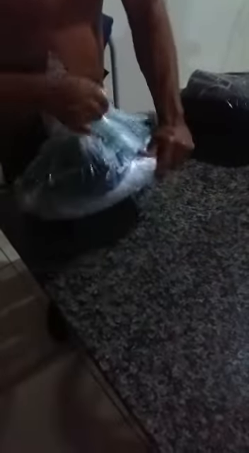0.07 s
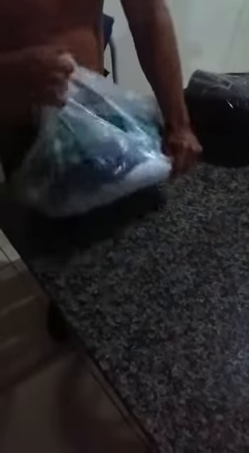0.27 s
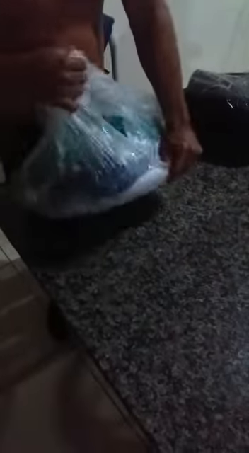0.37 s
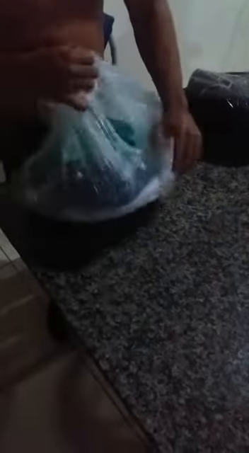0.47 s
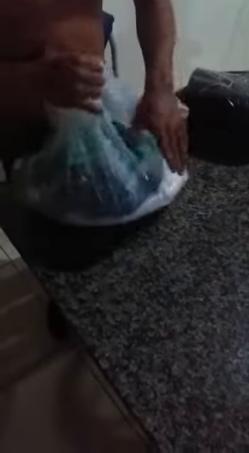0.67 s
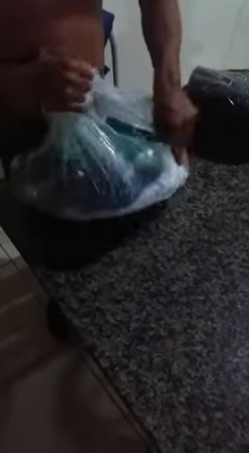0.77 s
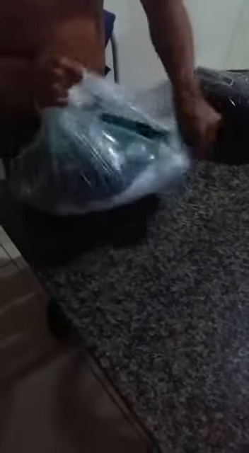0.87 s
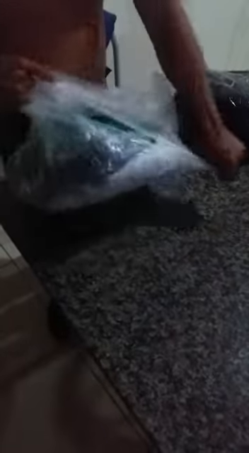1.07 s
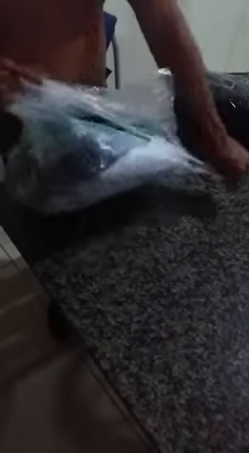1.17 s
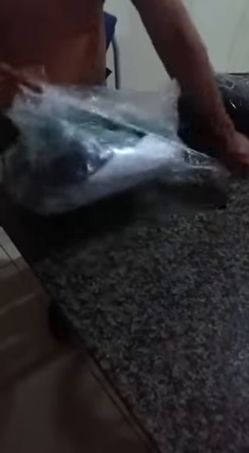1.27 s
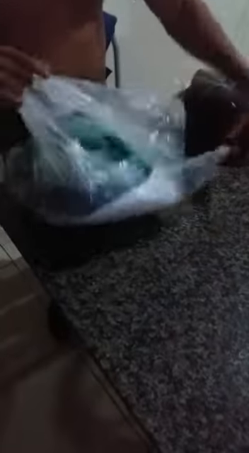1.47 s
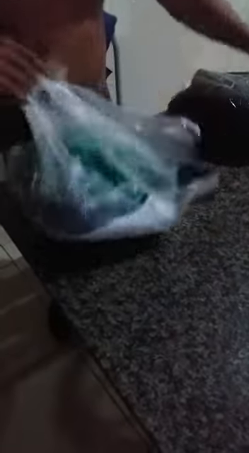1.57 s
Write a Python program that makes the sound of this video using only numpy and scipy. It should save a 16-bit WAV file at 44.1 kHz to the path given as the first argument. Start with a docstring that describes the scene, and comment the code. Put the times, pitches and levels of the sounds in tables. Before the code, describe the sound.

Two dull, clacking knocks sound as a bagged package hits a stone counter, its contents rattling briefly each time. Lighter bumps, a faint slide and soft plastic crinkling surround them, close by in a quiet, slightly echoing room.

```python
"""A packaged item in a plastic bag knocks down hard twice on a stone counter, with lighter bumps around.
Each blow is a dull thud and a plastic clack from damped resonances, plus a crunch of crushed film.
The contents clatter briefly after both hard blows, and the package slides with a faint hollow ring.
The bag rustles softly throughout in tiny crinkles, with a few sharper snaps as creases flip over.
A small, hard-walled room reverberates around it, over a quiet background."""
import sys
import numpy as np
from scipy import signal
from scipy.fft import rfft, irfft
from scipy.io import wavfile

SR = 44100
rng = np.random.default_rng(int(sys.argv[2]) if len(sys.argv) > 2 else 0)


def wrap_up_sound(samples):
    """Save the sound to the file named by the first command line argument, as 16-bit audio."""
    columns = np.atleast_2d(samples).T
    # keep every value between -1 and 1, then stretch to whole-number steps
    tamed = np.clip(columns, -1, 1)
    steps = np.round(tamed * 32767).astype(np.int16)
    wavfile.write(sys.argv[1], SR, steps)


N = 70560
T = np.arange(N) / SR


def from_db(db):
    """Decibels to gain."""
    return 10 ** (np.asarray(db) / 20)


def unit_rms(x):
    """Scale to unit rms."""
    return x / np.sqrt(np.mean(x ** 2) + 1e-20)


def at_hz(points, hz, column=1):
    """Read a table column on a log-frequency axis."""
    points = np.array(points)
    return np.interp(np.log(hz + 1e-9), np.log(points[:, 0]), points[:, column])


def equalise(x, curve):
    """Causal (minimum-phase) EQ along the given curve."""
    size = 2 * N
    gain = from_db(at_hz(curve, np.arange(N + 1) * SR / size))
    cepstrum = irfft(np.log(gain))
    cepstrum[1:N] *= 2
    cepstrum[N + 1:] = 0
    return irfft(rfft(x, size) * np.exp(rfft(cepstrum)))[:N]


def resonance(x, hz, width_hz):
    """Two-pole resonance with unity gain at its peak."""
    r = np.exp(-np.pi * width_hz / SR)
    poles = [1, -2 * r * np.cos(2 * np.pi * hz / SR), r * r]
    return signal.lfilter(np.array([1, 0, -1]) * (1 - r * r) / 2, poles, x + 1e-18)


def soften(x, hz):
    """One-pole low-pass."""
    r = np.exp(-2 * np.pi * hz / SR)
    return signal.lfilter([1 - r], [1, -r], x + 1e-18)


def butter(x, hz, kind, order):
    """Butterworth low-pass or high-pass."""
    return signal.sosfilt(signal.butter(order, hz, kind, fs=SR, output="sos"), x + 1e-18)


def cue(x, start_s):
    """Start a sound at the given time."""
    return np.concatenate([np.zeros(int(start_s * SR)), x])[:N]


def burst(t60):
    """A short, dying crackle of unit energy, whitened so that it has no pitch of its own."""
    fade = from_db(np.maximum(-60 * T / t60, -300))
    phase = np.angle(rfft(rng.standard_normal(N) * fade))
    crackle = irfft(np.exp(1j * phase), N) * np.sqrt(fade)
    return crackle / np.linalg.norm(crackle)


def grains(per_s, spread_db):
    """Random clicks of uneven size and sign."""
    sizes = from_db(spread_db * np.minimum(rng.exponential(1, N), 5))
    return sizes * rng.choice([-1, 1], N) * (rng.random(N) < per_s / SR)


# EQ of the background noise: f/Hz, gain/dB
ROOM_TONE_EQ = [(25, -85), (40, 0), (55, 0), (90, -3.5), (170, -0.5), (300, -2.5), (500, -8), (1000, -15.5),
                (2000, -16), (5000, -23), (9000, -40), (16000, -63)]


def room_tone():
    """A quiet, steady bed of dark noise."""
    return from_db(-52.5) * unit_rms(equalise(rng.standard_normal(N), ROOM_TONE_EQ))


# reverb of the hard walls: f/Hz, level/dB, t60/s
REVERB_BANDS = [(59.5, 4.5, 0.55), (162, -1, 0.62), (317, -10, 0.8), (583, -0.5, 0.57), (950, -1, 0.73),
                (1320, 0, 0.62), (2040, -7, 0.52), (4900, -2.5, .45), (8900, -4.5, 0.88), (14900, 2, 0.32)]


def reverb(send):
    """Reflections thicken after a short gap and die away, each half octave at its own rate."""
    predelay_s, build_s, lowest_hz, bands = 0.0024, 0.00067, 45, 18
    echoes = rfft(unit_rms(grains(per_s=7000, spread_db=-1)))
    hz = np.arange(N // 2 + 1) * SR / N
    band_position = np.clip(2 * np.log2((hz + 1e-9) / lowest_hz), 0, bands - 1)
    attack = 1 - np.exp(-np.maximum(T - predelay_s, 0) / build_s)
    response = 0
    for k in range(bands):
        centre_hz = lowest_hz * 2 ** (k / 2)
        fade = attack * from_db(-60 * T / at_hz(REVERB_BANDS, centre_hz, column=2))
        band = irfft(echoes * np.maximum(1 - abs(band_position - k), 0), N)
        response += band * from_db(at_hz(REVERB_BANDS, centre_hz)) * fade / np.linalg.norm(fade)
    return signal.fftconvolve(send, response)[:N]


# envelope of the crackle where the film is pulled tight: t/s, level/dB
CRACKLE_ENVELOPE = [(0, -72.5), (.1, -72), (.18, -60), (.36, -61), (.43, -64.5), (.56, -60), (.6, -68),
                    (.76, -73.5), (.81, -70), (.87, -75), (1.05, -67), (1.2, -61.5), (1.4, -77),
                    (1.52, -63), (1.6, -67)]


def fine_crackle():
    """The smallest creases tick in the top octave."""
    ticks = butter(grains(per_s=2500, spread_db=1), 7400, "high", order=2)
    return from_db(np.interp(T, *np.transpose(CRACKLE_ENVELOPE))) * unit_rms(ticks)


# envelope of the package sliding on the counter: t/s, level/dB
SLIDE_ENVELOPE = [(0, -63), (.04, -44), (.10, -54), (.15, -44), (.2, -55.5), (.32, -45), (.43, -51.5),
                  (.54, -53), (.6, -60), (1.6, -62)]


def slide():
    """Tiny slips on the stone excite a hollow ring of the package."""
    ring_hz = 692
    slips = grains(per_s=2000, spread_db=3)
    hollow = resonance(resonance(slips, ring_hz, width_hz=250), ring_hz, width_hz=500)
    return from_db(np.interp(T, *np.transpose(SLIDE_ENVELOPE))) * unit_rms(hollow)


# tone of the bag's film: f/Hz, gain/dB
FILM_EQ = [(60, -43), (160, -3.5), (450, 3), (740, -3.5), (1000, -4.5), (1450, -4), (2150, 4), (2700, -2),
           (3300, -2.5), (4200, -9.5), (5400, -7.5), (6800, -17), (8500, -24.5), (12000, -35.5),
           (15500, -34)]
# envelope of the rustle: t/s, level/dB
RUSTLE_ENVELOPE = [(0, -45.5), (.03, -47.5), (.10, -47), (.14, -41.5), (.19, -40.5), (.30, -47.5),
                   (.44, -47), (.52, -43.5), (.56, -45), (.59, -55.5), (.65, -49), (.75, -61.5),
                   (.85, -49.5), (.91, -53), (1.02, -46), (1.2, -41), (1.4, -47), (1.53, -49), (1.6, -44.5)]


def rustle():
    """Dense tiny crinkles in uneven spurts as the hands shift the bag."""
    flutter_hz, flutter_db = 30.5, 0.58
    flutter = unit_rms(soften(soften(rng.standard_normal(N), flutter_hz), flutter_hz))
    level_db = np.interp(T, *np.transpose(RUSTLE_ENVELOPE)) + flutter_db * flutter
    crinkles = grains(per_s=3500, spread_db=2.5)
    return from_db(level_db) * unit_rms(equalise(crinkles, FILM_EQ))


# single snaps of the film: t/s, pre-EQ level/dB, ring f/Hz
SNAP_CUES = [(0.0252, -12.5, 1850), (0.194, -11, 5200), (0.2081, 6.5, 5300), (0.2761, 0.5, 3100),
             (0.5148, -11, 2420), (0.5574, -6, 6500), (.628, -11.5, 4940), (.8085, -15, 5430),
             (.8555, -15, 2100), (0.9563, -14.5, 3230), (0.9932, -7.5, 3880), (1.1138, -4, 2240),
             (1.123, -5.5, 2230), (1.1291, 0, 5300), (1.1731, -6, 2260)]


def snaps():
    """A crease flips over: a very short crackle with a ring of its own."""
    track = 0
    for start_s, db, ring_hz in SNAP_CUES:
        crackle = burst(t60=0.014)
        snap = crackle + from_db(2.5) * resonance(crackle, ring_hz, width_hz=1300)
        track += from_db(db) * cue(snap / np.linalg.norm(snap), start_s)
    return equalise(track, FILM_EQ)


# the contents settling after a hard blow: t/s, hold/s, level/dB, ring f/Hz
CLATTER_CUES = [(0.227, 0.021, -31.5, 1440), (1.237, 0.052, -33.5, 1020)]


def clatter():
    """The contents chatter against each other and shake the bag."""
    release_s = 0.029
    track = 0
    for start_s, hold_s, db, ring_hz in CLATTER_CUES:
        touches = grains(per_s=690, spread_db=-1)
        contents = unit_rms(soften(resonance(touches, ring_hz, width_hz=400), hz=2600))
        film = from_db(-3) * unit_rms(equalise(touches, FILM_EQ))
        envelope = (T > start_s) * np.exp(-np.maximum(T - start_s - hold_s, 0) / release_s)
        track += from_db(db) * (contents + film) * envelope
    return track


# damped low and high modes of the package on the counter: f/Hz, width/Hz, level/dB
THUD_RESONANCES = [(181, 24, 9), (261, 193, 24), (448, 180, 28.5), (623, 64, 23)]
CLACK_RESONANCES = [(1340, 460, 20.7), (2140, 630, 13.5), (3000, 920, 16), (3640, 760, 5.3),
                    (5090, 1400, 16)]
# tone of the film crushed under a blow: f/Hz, gain/dB
CRUNCH_EQ = [(100, -28), (500, -14), (1200, -10), (2200, 15), (3200, 3), (4500, -8), (5600, 4), (7000, -4),
             (8500, -8), (11500, -14.5), (15500, -13)]
# the package hits the counter: t/s, thud gain/dB, clack gain/dB, crunch gain/dB, crunch t60/s,
# crunch roll-off/Hz, thud pitch/ratio, contact brightness/Hz, contact low cut/Hz, reverb send/dB
KNOCK_CUES = [(0.2081, -18.5, -22, -12, 0.0078, 8000, 1.06, 1210, 60, 5.5),
              (0.2162, 0.5, -1, -5.5, .012, 4030, 0.98, 4300, 90, -1.5),
              (0.2167, -14, -6, 5, 0.014, 4540, 1.66, 5370, 119, -3),
              (0.2239, -12.5, -18, -9, 0.014, 4500, 1.35, 1950, 72.4, -8),
              (0.2620, -13, -31, -12, .01, 4000, 1.8, 2000, 255, -29),
              (0.7150, -35, -36, -45, 0.017, 4000, 0.61, 900, 150, 5),
              (1.116, -12, -36, -4.5, 0.059, 12600, 0.6, 630, 140, -5),
              (1.1677, -23.5, -28, -16.5, .04, 4900, 1.9, 3050, 200, -1),
              (1.235, 3, 0, 2, 0.002, 5000, 1.126, 2500, 197, -5),
              (1.2359, -11.5, -4, 2.5, 0.0066, 15000, 1.15, 2500, 214, -3.5),
              (1.3186, -21.5, -32, -21, 0.0088, 4000, 0.56, 500, 193, 4.5),
              (1.3284, -42, -21, -14, 0.01, 14000, 0.84, 5940, 150, 0),
              (1.5965, -32.5, -28, -18, 0.026, 6040, 0.71, 990, 59.4, -5)]


def knocks():
    """Each blow layers a dull thud, a plastic clack and a film crunch; returns direct sound and send."""
    click = signal.unit_impulse(N)
    even_crunch = equalise(click, CRUNCH_EQ)  # the reverb is fed a smooth crunch with an even spectrum
    direct, send = 0, 0
    for start_s, thud_db, clack_db, crunch_db, t60, top_hz, pitch, bright_hz, low_hz, send_db in KNOCK_CUES:
        push = butter(click, bright_hz, "low", order=3)
        push = butter(push, low_hz, "high", order=2)
        thud = sum(from_db(db) * resonance(push, hz * pitch, width) for hz, width, db in THUD_RESONANCES)
        clack = sum(from_db(db) * resonance(push, hz, width) for hz, width, db in CLACK_RESONANCES)
        body = from_db(thud_db) * soften(thud, hz=1210) + from_db(clack_db) * clack
        crunch = equalise(burst(t60), CRUNCH_EQ)
        near_crunch = from_db(crunch_db) * soften(crunch, top_hz)
        far_crunch = from_db(crunch_db) * soften(even_crunch, top_hz)
        direct += cue(body + near_crunch, start_s)
        send += from_db(send_db) * cue(body + far_crunch, start_s)
    return direct, send


def scene():
    """Mono mix over the room tone; the blows and the bag feed the reverb."""
    blows, blow_send = knocks()
    bag = rustle() + snaps() + clatter()
    direct = room_tone() + slide() + fine_crackle() + bag + blows
    return (direct + reverb(blow_send + from_db(-2.5) * bag))[None]


def record(dry):
    """The microphone loses the deep bass, peaks are rounded and the top is cut."""
    ceiling, high_cut_hz = 1.6, 16000
    thin = butter(dry, hz=48.5, kind="high", order=4)
    rounded = ceiling * np.tanh(thin / ceiling)
    return signal.sosfilt(signal.ellip(10, .2, 80, high_cut_hz, fs=SR, output="sos"), rounded)


dry = scene()
out = record(dry)
wrap_up_sound(out)
```